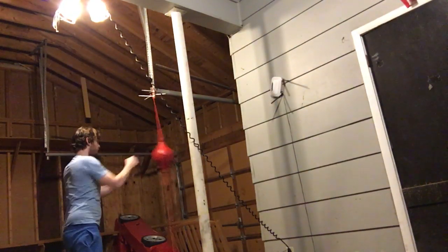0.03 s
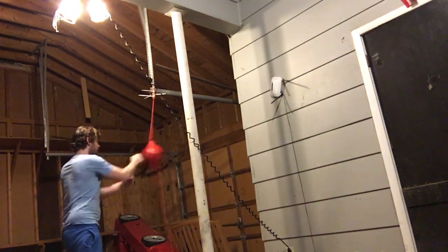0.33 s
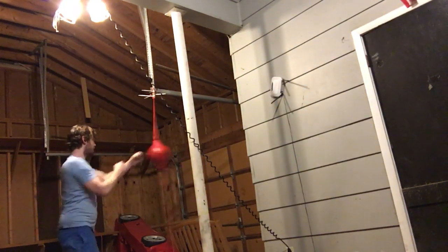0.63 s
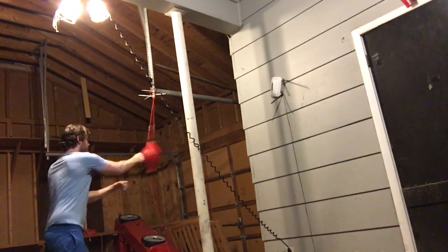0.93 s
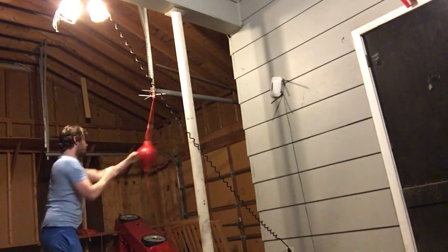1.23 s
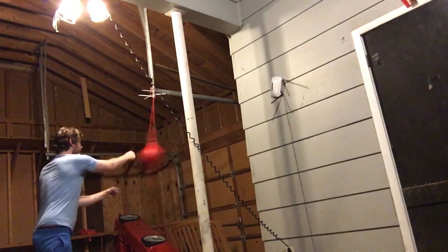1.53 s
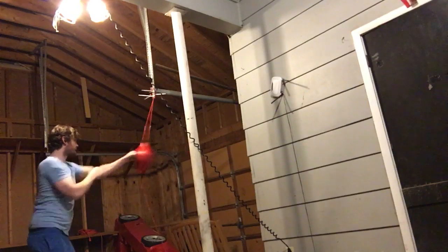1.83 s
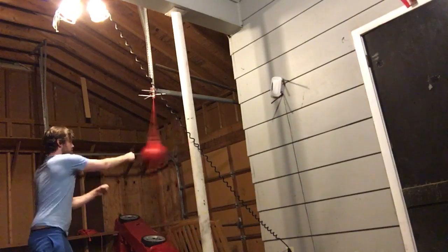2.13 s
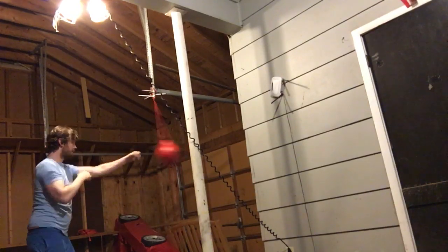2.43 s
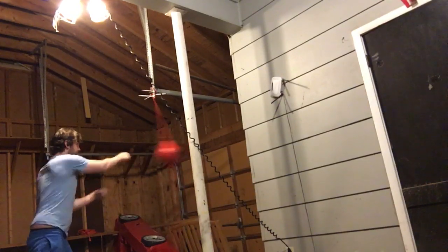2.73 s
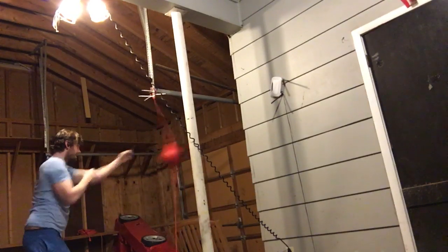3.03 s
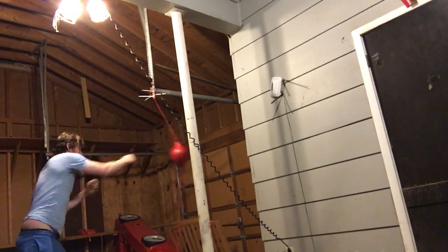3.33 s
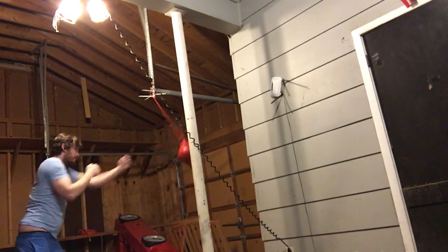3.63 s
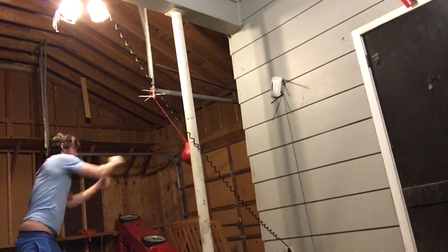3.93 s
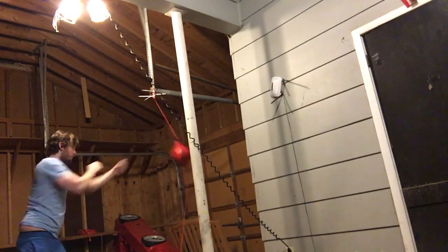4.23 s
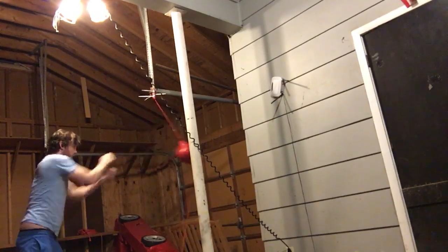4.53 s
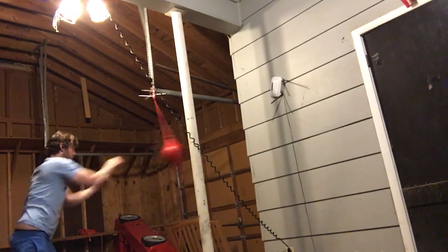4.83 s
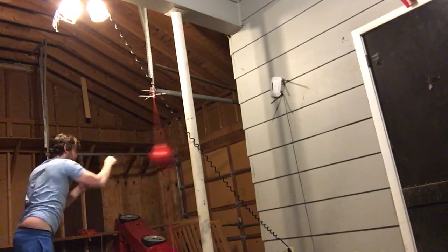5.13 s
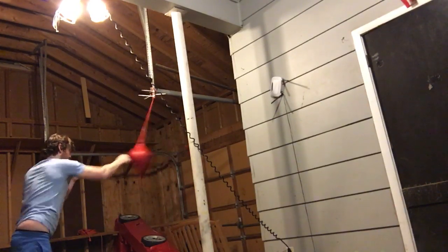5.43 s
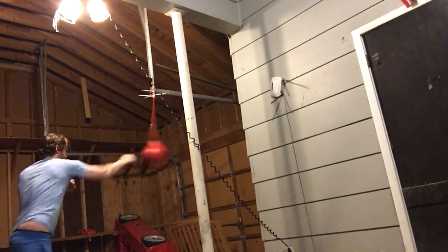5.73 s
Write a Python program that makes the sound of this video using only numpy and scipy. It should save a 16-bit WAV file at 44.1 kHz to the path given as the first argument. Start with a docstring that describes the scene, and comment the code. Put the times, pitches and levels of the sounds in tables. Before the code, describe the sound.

Rapid, even punches smack and thump a leather double-end bag in a reverberant garage, over light footwork and small metal squeaks.

```python
"""Bare fists smack a double-end bag, three or four times a second, in a wooden garage.
Each punch is a leather slap and a deep thump of the air bladder inside the bag;
walls and roof send both back, over a faint hush of air. Shoes scuff the concrete floor,
the cord's metal hook squeaks as the bag swings out, and once the bag knocks on its cords."""
import sys
import numpy as np
from scipy import signal
from scipy.fft import rfft, irfft, next_fast_len
from scipy.io import wavfile
from scipy.ndimage import uniform_filter1d

SR = 44100
rng = np.random.default_rng(int(sys.argv[2]) if len(sys.argv) > 2 else 0)


def wrap_up_sound(samples):
    """Save the sound to the file named by the first command line argument, as 16-bit audio."""
    columns = np.atleast_2d(samples).T
    # keep every value between -1 and 1, then stretch to whole-number steps
    tamed = np.clip(columns, -1, 1)
    steps = np.round(tamed * 32767).astype(np.int16)
    wavfile.write(sys.argv[1], SR, steps)


N = 254456
TAIL = 2 ** 15  # samples for the garage to ring on after a sound


def gain(db):
    """Turn decibels into a number to multiply by."""
    return 10 ** (np.asarray(db) / 20)


def unit_energy(x):
    """Scale a sound so that its squared samples add up to one."""
    return x / np.sqrt(np.sum(x ** 2))


def frequencies(size):
    """The frequencies that make up a sound of this many samples."""
    return np.maximum(np.fft.rfftfreq(size, 1 / SR), 1)


def curve(points, hz):
    """Join (frequency, level) points with lines, giving every octave equal room."""
    point_hz, db = np.transpose(points)
    return np.interp(np.log(hz), np.log(point_hz), db)


def bell(hz, centre_hz, octaves):
    """A bell-shaped bump of height one around a pitch."""
    return np.exp(-(np.log2(hz / centre_hz) / octaves) ** 2)


def colour(x, db):
    """Turn each frequency of a sound up or down by its level in db."""
    cepstrum = irfft(np.log(gain(db)), len(x))
    # fold the filter so that it rings after a sound, not before
    cepstrum[1:len(x) // 2] *= 2
    cepstrum[len(x) // 2 + 1:] = 0
    return irfft(rfft(x) * np.exp(rfft(cepstrum)), len(x))


def add(track, start_s, x):
    """Mix a sound into the track from the given time."""
    i = int(round(start_s * SR))
    x = x[max(-i, 0):max(len(track) - i, 0)]
    track[max(i, 0):max(i, 0) + len(x)] += x


def crack(db, decay_s):
    """A burst of tiny contacts that dies in milliseconds, with the tone given by db."""
    size = 2 * (len(db) - 1)
    burst = rng.standard_normal(size) * np.exp(-np.arange(size) / SR / decay_s)
    smooth_power = uniform_filter1d(np.abs(rfft(burst)) ** 2, size=32)
    return colour(burst, db - 10 * np.log10(smooth_power))


def echoes(table, stray_ms, stray_db):
    """The direct sound and its echoes, nudged at random because the bag swings about."""
    response = signal.unit_impulse(TAIL)
    for ms, db in table:
        late, loud = rng.standard_normal(2)
        delay_ms = max(ms + stray_ms * late, 0.5)
        add(response, delay_ms / 1000, gain([db + stray_db * loud]))
    return response


# Fists landing on the bag: (time [s], thump level [dB], slap level [dB], snappiness [dB],
# ring of the air under the fist [Hz], ring of the tight leather [Hz])
PUNCHES = [(0.1088, -45, -50, -1, 1160, 5700), (0.3851, -33.5, -41.5, -0.5, 2250, 4500),
           (0.6595, -35.5, -37.5, -3, 1060, 5700), (0.951, -31.5, -32, -2.5, 1075, 2200),
           (1.2252, -34, -40, -0.5, 1150, 2920), (1.5236, -36.5, -37.5, 0, 1560, 5500),
           (1.8149, -33, -35, 1, 900, 1410), (2.1154, -34, -34.5, 4, 1620, 5940),
           (2.3917, -33, -31.5, -0.5, 910, 1650), (2.6904, -33.5, -39, 2, 2580, 7000),
           (2.963, -32.5, -36, 1.5, 1330, 2870), (3.2494, -29, -34, 2.5, 1730, 2830),
           (3.525, -31, -32, -2.5, 1130, 3770), (3.824, -30, -33.5, -1, 1590, 2120),
           (4.0918, -26, -30.5, -1.5, 986, 4330), (4.373, -29, -35.5, -4.5, 1060, 3100),
           (4.6402, -28, -32, 0.5, 1320, 3530), (4.9214, -26, -32.5, 1, 770, 2000),
           (5.1955, -26.5, -31.5, 0, 945, 1370), (5.4738, -29.5, -35, 1.5, 1090, 2130),
           (5.75, -27.5, -37, -1, 860, 2830)]


def punches(slap_boost_db=35, thump_boost_db=-1, usual_gap_db=5):
    """Every punch sends a slap and a thump through the garage."""
    # a punch just before the start still rings
    _, thump_db, slap_db, *tone = PUNCHES[1]
    earlier = (-0.18, thump_db - 1.5, slap_db - 1.5, *tone)
    out = np.zeros(N)
    for s, thump_db, slap_db, snappy_db, *rings_hz in [*PUNCHES, earlier]:
        depth_db = thump_db - slap_db - usual_gap_db  # a deep punch has extra thump for its slap
        ahead = slap(depth_db, snappy_db, *rings_hz, focus=1)
        # the room hears all sides of the bag at once, which blurs its rings
        around = slap(depth_db, snappy_db, *rings_hz, focus=0.75)
        add(out, s, gain(slap_db + slap_boost_db) * near_bounces(ahead, around, direct_db=0.2))
        add(out, s - 0.001, gain(thump_db + thump_boost_db) * (wall_bounces(thump(snappy_db)) + boom()))
    return out


# The basic tone of slapped leather: (frequency [Hz], level [dB])
LEATHER_TONE = [(100, -17.5), (220, -4), (310, -4.5), (440, -2.5), (600, -1.5), (850, 0), (1100, 0.5),
                (1500, -0.5), (2100, -6.5), (3200, -6), (6500, -9), (10000, -13.5), (15000, -17)]


def slap(depth_db, snappy_db, air_hz, leather_hz, focus):
    """Knuckles on leather: a flat fist snaps, a deep one sounds hollow; trapped air and leather ring."""
    hz = frequencies(4096)
    hollow_db, top_db = 0.67 * depth_db, 1.35 * snappy_db
    fist_tone = [(500, hollow_db), (950, 0), (1700, 0),
                 (3200, snappy_db), (6000, snappy_db), (10000, top_db)]
    rings = bell(hz, air_hz, octaves=0.2) + bell(hz, leather_hz, octaves=0.13)
    ring_db = focus * (6.5 + 0.25 * depth_db)
    decay_s = 0.00105 * np.exp(-0.05 * depth_db)  # a deeper punch has a shorter slap
    return crack(curve(LEATHER_TONE, hz) + curve(fist_tone, hz) + ring_db * rings, decay_s)


def thump(snappy_db, leak_hz=70.5, soft_hz=420):
    """The fist dents the bladder: one brief dip of pressure, whose slowest part leaks round the bag."""
    t = np.arange(SR // 10) / SR
    push_s = 0.0021 * np.exp(-0.2052 * snappy_db)  # a snappier punch dents it faster
    dent = -t / push_s * np.exp(1 - t / push_s)
    leaked = signal.sosfilt(signal.butter(2, leak_hz, "high", fs=SR, output="sos"), dent)
    return signal.sosfilt(signal.butter(2, soft_hz, fs=SR, output="sos"), leaked)


# Echoes from hard surfaces close to the bag: (delay [ms], level [dB])
NEAR_ECHOES = [(2.1, -3.5), (4.8, -2), (8.4, -8.5), (12.8, -8), (21.8, -12), (31, -17)]


def near_bounces(ahead, around, direct_db, clutter_db=-3, clutter_s=0.0038, reverb_db=4):
    """Sound sent ahead arrives with quick echoes; sound sent all around fills the garage."""
    t = np.arange(TAIL) / SR
    near = echoes(NEAR_ECHOES, stray_ms=0.5, stray_db=1.5)
    # studs, rafters and shelves scatter the sound
    clutter = unit_energy(rng.standard_normal(TAIL) * np.sqrt(t) * np.exp(-t / clutter_s))
    near += gain(clutter_db) * clutter
    near[0] = gain(direct_db)
    wash = signal.fftconvolve(around, reverb(build_s=0.0054))
    return signal.fftconvolve(ahead, near) + gain(reverb_db) * wash


# Echoes of the thump from the big walls and the roof: (delay [ms], level [dB])
WALL_ECHOES = [(4.1, 6.5), (15.2, -4.5), (17.9, 6.5), (21, 1.5), (31, 0), (33.6, 11.5), (39.2, 7.5),
               (48, 0), (96.2, 2), (99.8, 3), (113.6, -2.5), (139.5, 1.5), (153, -3.5)]


def wall_bounces(sound, scatter_db=8, scatter_hz=190, dull_hz=130, crisp_s=0.054):
    """Long sound waves bounce cleanly off the walls; only shorter ones scatter."""
    walls = echoes(WALL_ECHOES, stray_ms=0.22, stray_db=0.5)
    crisp_share = np.exp(-(np.arange(TAIL) / SR / crisp_s) ** 2)
    # after several bounces an echo keeps only its bass
    dull = irfft(rfft(walls * (1 - crisp_share)) / (1 + (frequencies(TAIL) / dull_hz) ** 4), TAIL)
    cut_bass = signal.butter(2, scatter_hz, "high", fs=SR, output="sos")
    scattered = gain(scatter_db) * signal.sosfilt(cut_bass, reverb(build_s=0.033))
    return signal.fftconvolve(sound, walls * crisp_share + dull + scattered)[:TAIL]


# The garage's own low notes: (pitch [Hz], level [dB], time to fade by 60 dB [s])
GARAGE_NOTES = [(52.8, -23, 1.04), (64.3, -41, 1.4), (77.37, -29.5, 2.8), (107.1, -12.5, 0.26),
                (147, -50, 0.15), (180.5, -16.5, 0.82), (227, -24.5, 0.7), (244, -18, 0.71),
                (255.2, -22.5, 0.93), (296.6, -29, 1.4)]


def boom(boost_db=5, build_s=0.016):
    """Waves trapped between the walls swell after a thump and hang on."""
    t = np.arange(TAIL) / SR
    notes = sum(gain(db) * np.sin(2 * np.pi * hz * t) * gain(-60 * t / fade_s)
                for hz, db, fade_s in GARAGE_NOTES)
    return gain(boost_db) * notes * (1 - np.exp(-t / build_s))


# The garage's wash of blurred echoes: (frequency [Hz], level [dB], time to fade by 60 dB [s])
REVERB_BANDS = [(60, 4, 0.69), (185, 1, 0.52), (297, 5.5, 0.69), (470, 0.5, 0.64), (686, -1.5, 0.72),
                (1200, 0, 0.76), (2680, -1, 0.81), (5900, -2, 0.55), (10000, -3, 0.43), (15000, -3.5, 0.32)]


def reverb(build_s):
    """Countless echoes build up, then each band of frequencies dies away at its own speed."""
    t = np.arange(TAIL) / SR
    noise_spectrum = rfft(rng.standard_normal(TAIL))
    wash = np.zeros(TAIL)
    for band_hz, db, fade_s in REVERB_BANDS:
        # one at this band, falling to zero at its neighbours
        share = curve([(hz, float(hz == band_hz)) for hz, *_ in REVERB_BANDS], frequencies(TAIL))
        wash += irfft(noise_spectrum * share, TAIL) * gain(db - 60 * t / fade_s)
    return unit_energy(wash * (1 - np.exp(-t / build_s)))


# The tone of the garage's quiet air: (frequency [Hz], level [dB])
AIR_TONE = [(25, -16), (55, 3.5), (100, -7), (250, -11), (600, -19), (1300, -17.5), (3000, -23),
            (7000, -31), (15000, -34)]


def air(level_db=-59.5):
    """The still air of the garage: a faint, low, steady hush."""
    hush = colour(rng.standard_normal(N), curve(AIR_TONE, frequencies(N)))
    return gain(level_db) * unit_energy(hush) * np.sqrt(N)


# Shoe scuffs: (time of loudest point [s], length [s], level [dB])
SCUFFS = [(0.917, 0.23, -47.5), (1.392, 0.34, -46.5), (1.872, 0.14, -43), (2.063, 0.13, -44),
          (2.174, 0.081, -45), (3.178, 0.12, -42.5), (3.609, 0.16, -39), (3.828, 0.19, -50),
          (4.015, 0.19, -45), (4.178, 0.078, -41.5), (4.465, 0.31, -48.5), (4.752, 0.26, -42.5),
          (4.928, 0.1, -40.5), (5.325, 0.14, -50)]
# The tone of a rubber sole on concrete: (frequency [Hz], level [dB])
SOLE_TONE = [(100, -17), (600, -4), (1500, -5), (3000, 1), (6500, -0.5), (10000, -3.5), (15000, -6)]


def shoes(grit_db=3, rise_share=0.65, reverb_db=2):
    """Soles slide over grit: many tiny slips swell and fade with each step, and the garage echoes them."""
    t = np.arange(N) / SR
    swells = sum(gain(db) * np.interp((t - s) / length_s, [-rise_share, 0, 1 - rise_share], [0, 1, 0])
                 for s, length_s, db in SCUFFS)
    slips = rng.standard_normal(N) * gain(grit_db * rng.exponential(size=N))
    scrape = unit_energy(colour(slips, curve(SOLE_TONE, frequencies(N)))) * np.sqrt(N)
    room = unit_energy(signal.unit_impulse(TAIL) + gain(reverb_db) * reverb(build_s=0.0019))
    return signal.fftconvolve(swells * scrape, room)[:N]


# Squeaks of the cord's metal hook: (time of loudest point [s], pitch [Hz], level [dB])
HOOK_SQUEAKS = [(1.31, 2800, -56), (3.35, 3000, -54), (3.937, 3200, -46), (4.19, 3170, -45.5),
                (4.53, 2640, -52), (4.78, 2830, -51), (5.33, 3000, -45), (5.62, 2700, -53)]


def hook(length_s=0.14, width_octaves=0.11, stick_db=4):
    """The hook sticks and slips in its eye as the cord pulls: a brief, rough squeak."""
    t = np.arange(N) / SR
    out = np.zeros(N)
    for s, hz, db in HOOK_SQUEAKS:
        slips = rng.standard_normal(N) * gain(stick_db * rng.exponential(size=N))
        squeak = irfft(rfft(slips) * bell(frequencies(N), hz, width_octaves), N)
        swell = np.exp(-(2 * (t - s) / length_s) ** 2)
        out += gain(db) * swell * unit_energy(squeak) * np.sqrt(N)
    return out


# The bag's light knock on its cords: (time [s], level [dB], pitch [Hz])
CORD_KNOCKS = [(3.215, -43, 850)]


def cord_knock(boost_db=35):
    """The bag knocks on its cords: a short tap that bounces round the garage."""
    out = np.zeros(N)
    for s, db, hz in CORD_KNOCKS:
        tone_db = 24 * (bell(frequencies(4096), hz, octaves=2.2) - 1)
        tap = crack(tone_db, decay_s=0.0015)
        add(out, s, gain(db + boost_db) * near_bounces(tap, tap, direct_db=5))
    return out


def scene():
    """Punches, air, footwork, hook and cords, mixed into one channel."""
    return (punches() + air() + shoes() + hook() + cord_knock())[None]


# How much the microphone lifts or lowers each frequency: (frequency [Hz], level [dB])
MIC_TONE = [(27, -10), (46, 5), (4400, 2), (4900, 0.5), (5700, 1), (7000, 0.5), (7800, -4.5), (9500, -4.5),
            (10400, -9.5), (11500, -5.5), (15500, -8.5)]


def record(dry, top_hz=15900):
    """A phone microphone thins the deepest bass, colours the treble and cuts the top."""
    size = next_fast_len(N + SR)
    heard = irfft(rfft(dry, size) * gain(curve(MIC_TONE, frequencies(size))), size)[:, :N]
    return signal.sosfilt(signal.ellip(10, 0.2, 70, top_hz, fs=SR, output="sos"), heard)


dry = scene()
out = record(dry)
wrap_up_sound(out)
```